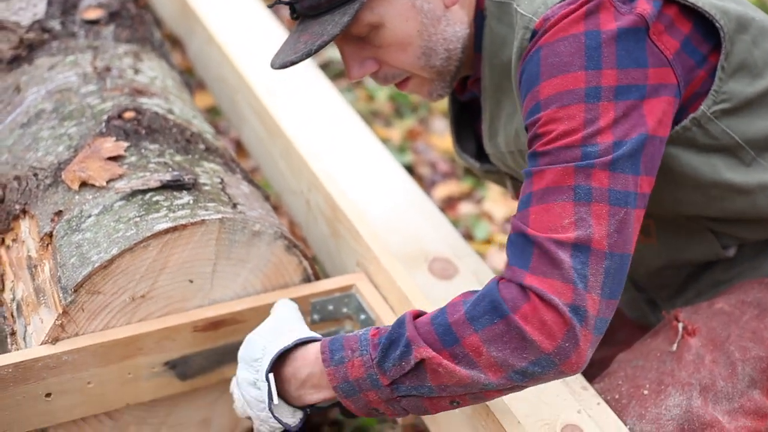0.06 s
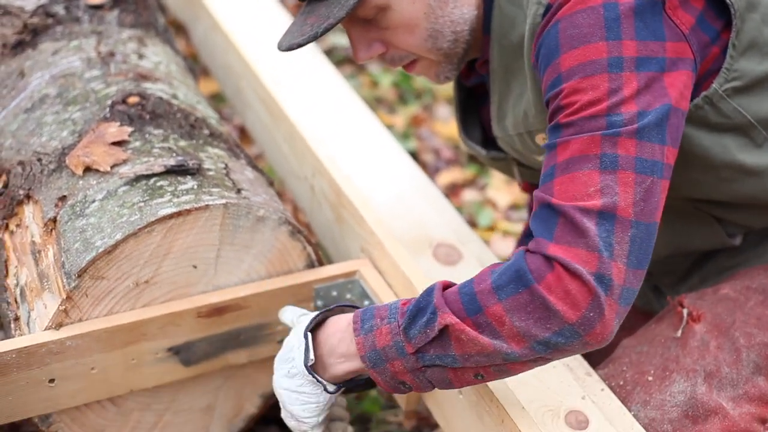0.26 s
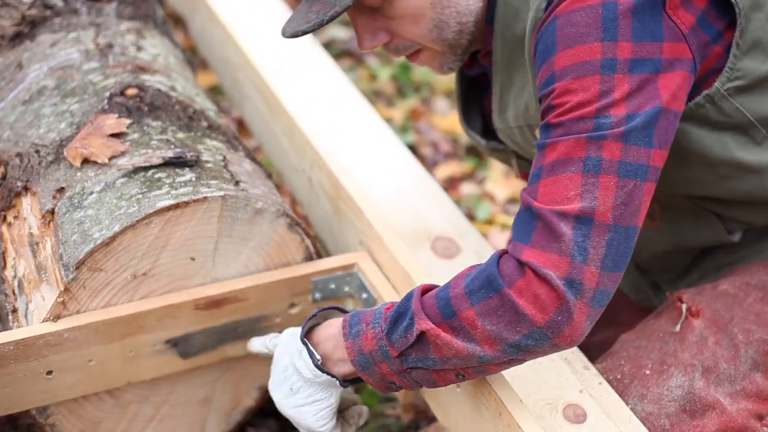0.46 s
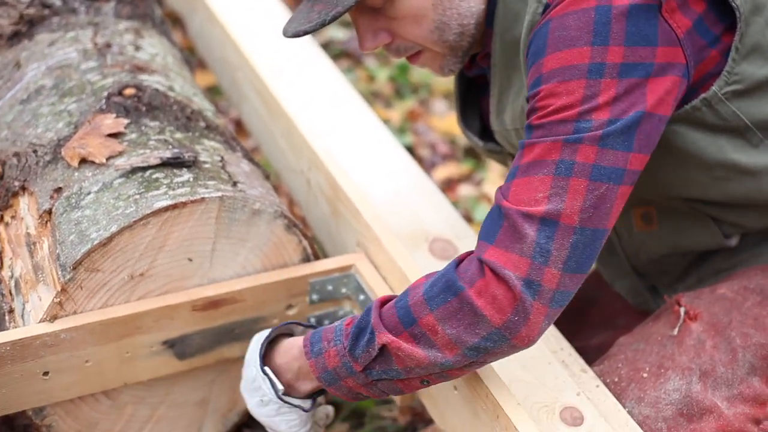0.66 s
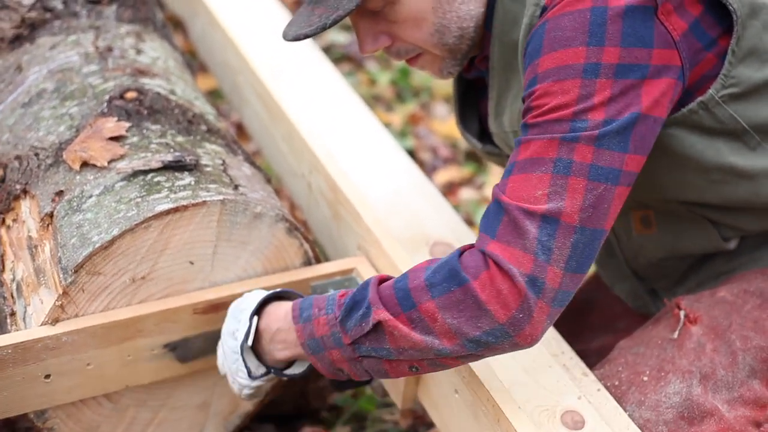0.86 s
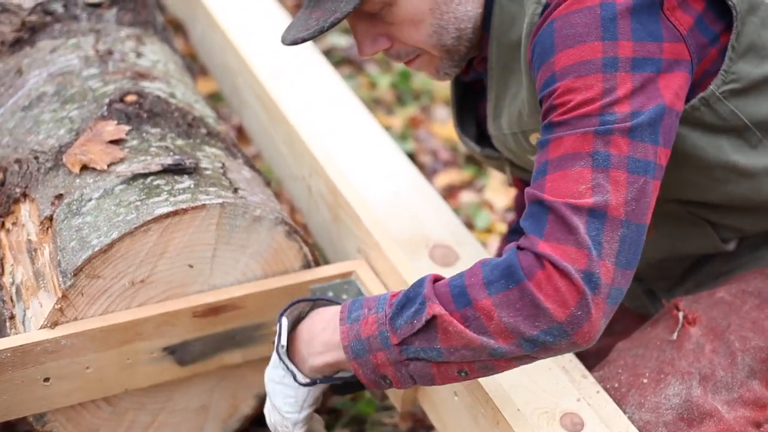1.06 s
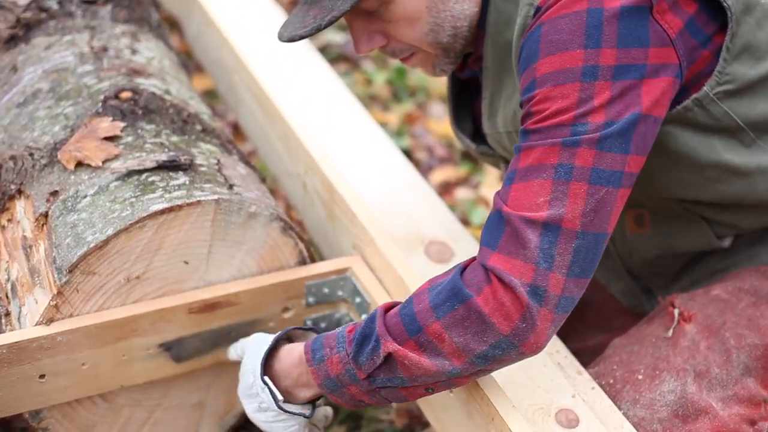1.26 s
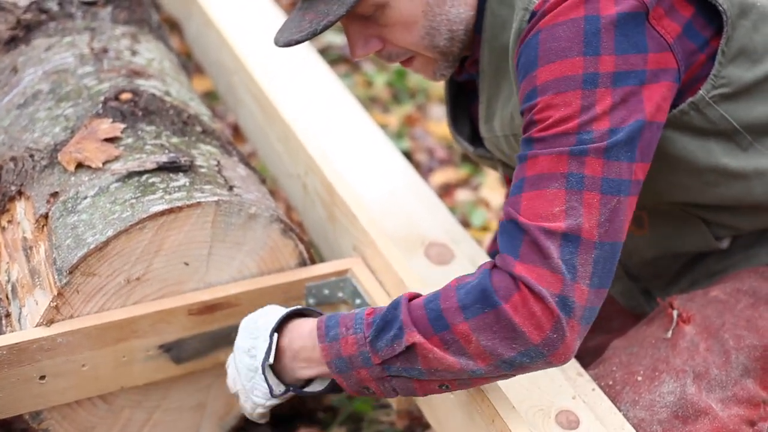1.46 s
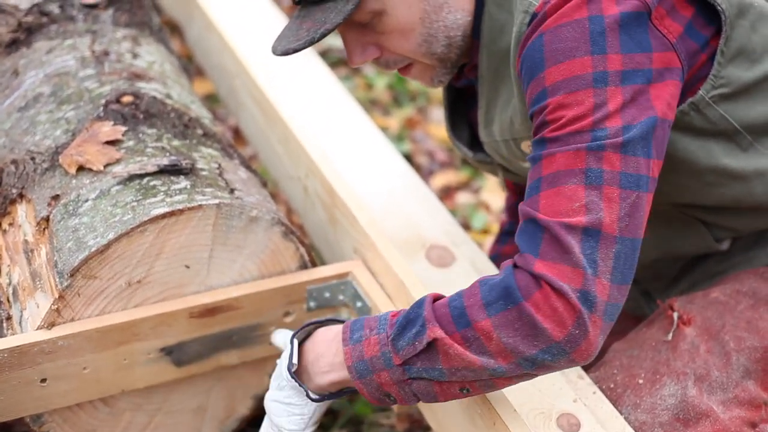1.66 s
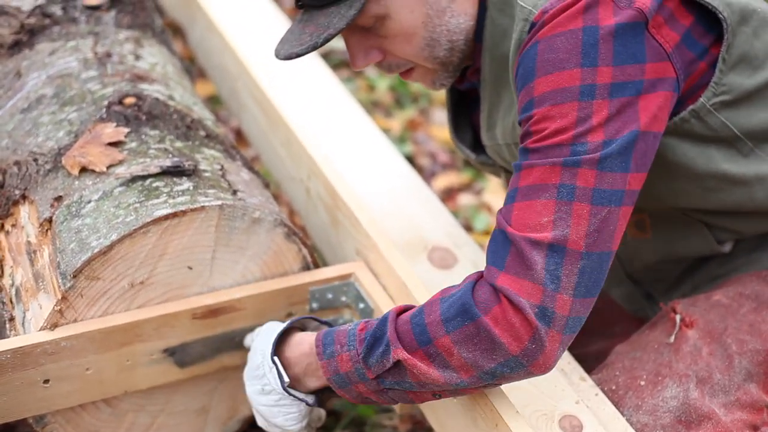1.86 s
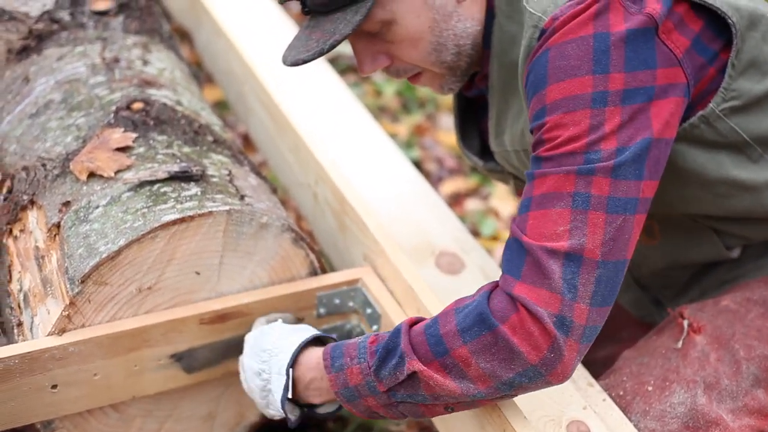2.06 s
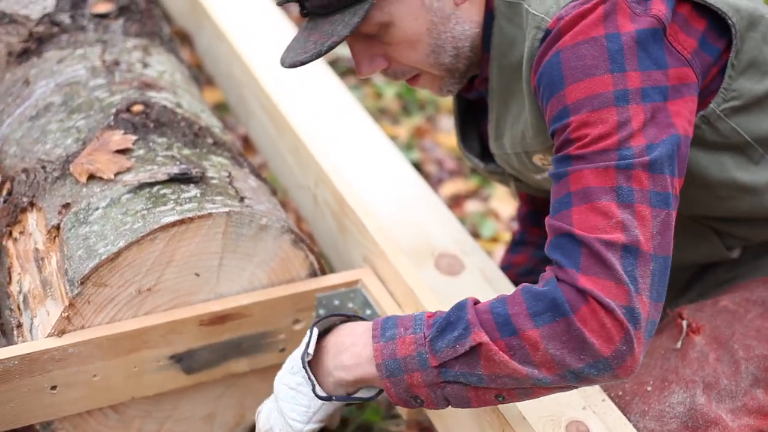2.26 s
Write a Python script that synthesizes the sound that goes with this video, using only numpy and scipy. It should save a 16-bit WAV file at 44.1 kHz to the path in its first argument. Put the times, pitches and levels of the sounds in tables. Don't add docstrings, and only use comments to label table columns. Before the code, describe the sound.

Metal clamp handling on a wooden frame, close and dry outdoors. Soft rubbing leads to a loud, slightly overloaded snap at 0.22 seconds. Small ticks and a woody, low knock cluster at 0.37-0.47, a sharp metallic knock at 0.78, a bright click at 0.91. Then mostly quiet scuffs, a tiny tick at 1.35, light rattling and a hissy metal scrape around 1.95-2.05, faint scuffs to the end. Faint air and low distant engine hum throughout.

```python
import sys
import numpy as np
from scipy import signal
from scipy.fft import rfft, irfft
from scipy.io import wavfile
from scipy.ndimage import uniform_filter1d

SR = 44100
rng = np.random.default_rng(int(sys.argv[2]) if len(sys.argv) > 2 else 0)


def digitize_waveform(pressure):
    field = np.atleast_2d(pressure).T
    bounded = np.clip(field, -1, 1)
    quanta = np.round(bounded * 32767).astype(np.int16)
    wavfile.write(sys.argv[1], SR, quanta)


def gain_from_db(level_db):
    decades = np.asarray(level_db, float) / 20
    return 10 ** decades


N = 101429


def evened(x):
    return x / np.sqrt(np.mean(x ** 2) + 1e-20)


def over_time(points):
    return np.interp(np.arange(N) / SR, *np.transpose(points))


def colour(points, size):
    hz, db = np.transpose(points)
    bins_hz = np.fft.rfftfreq(size, 1 / SR)
    return gain_from_db(np.interp(np.log(bins_hz + 1), np.log(hz + 1), db))


def add(mix, start_s, sound):
    part = mix[round(start_s * SR):][:len(sound)]
    part += sound[:len(part)]


def resonate(x, hz, width_hz):
    radius = np.exp(-np.pi * width_hz / SR)
    pole = radius * np.exp(2j * np.pi * hz / SR)
    for _ in range(2):
        x = 2 * signal.lfilter([1 - radius], [1, -pole], x).real
    return x


# time_s, gain_db
GAIN_CONTROL = [
    (0, -0.5),
    (.225, 2.5),
    (.25, -11.5),
    (.5, -8.5),
    (.77, -1.5),
    (.83, -6.5),
    (1.5, -3.5),
    (2.3, 0.5),
]


def camera_gain_db():
    return over_time(GAIN_CONTROL)


def preamp_hiss():
    low_pass = signal.butter(8, 14900, fs=SR, output="sos")
    return gain_from_db(-60.5) * signal.sosfilt(low_pass, rng.standard_normal(N))


def engine_drone():
    return gain_from_db(-59.5) * evened(resonate(rng.standard_normal(N), hz=65, width_hz=24))


# pitch_hz, density_db (per Hz)
AIR_SPECTRUM = [(15, -50), (40, -10.5), (219, -4), (387, -12), (431, -13.5), (1210, -15), (1580, -17),
                (7430, -20), (16300, -68.5)]


def air():
    real, imag, patches = rng.standard_normal((N // 128 + 5, 257, 3)).T
    patches = uniform_filter1d(uniform_filter1d(patches, 8, 0), 16, 1)
    spectrum = (real + 1j * imag) * gain_from_db(1.85 * evened(patches))
    hiss = signal.istft(spectrum, nperseg=512, noverlap=384)[1][:N]
    return gain_from_db(-42) * evened(irfft(rfft(hiss) * colour(AIR_SPECTRUM, N), N))


# time_s, level_db
RUB_EFFORT = [(0, -52), (.1, -48.5), (.15, -47.5), (.21, -35.5), (.26, -63.5), (.62, -58.5), (.75, -46.5),
              (.84, -56), (1.25, -58.5), (1.57, -53.5), (1.66, -50.5), (1.82, -60.5), (1.9, -55.5),
              (2.17, -48), (2.3, -48)]
# pitch_hz, width_hz, level_db
RUB_BODY = [(281, 130, -3), (943, 410, -5.5), (1444, 63, -8), (1622, 250, 0.5), (3450, 240, -11),
            (4350, 910, -2), (6500, 560, -10.5)]


def rubbing():
    catches_per_s, spread_db, flutter_db = 4000, 2.8, 2.5
    strength = gain_from_db(spread_db * np.minimum(rng.exponential(1, N), 4))
    caught = rng.random(N) < catches_per_s / SR
    catches = rng.standard_normal(N) * strength * caught
    body = np.zeros(N)
    for hz, width_hz, db in RUB_BODY:
        swell = uniform_filter1d(uniform_filter1d(rng.standard_normal(N), 1500), 1500)
        body += gain_from_db(db + flutter_db * evened(swell)) * evened(resonate(catches, hz, width_hz))
    return gain_from_db(3 + over_time(RUB_EFFORT) - camera_gain_db()) * evened(body)


# start_s, length_s, level_db, pitch_hz, rise_s
SLIPS = [(0.16, 0.1, -48, 3750, 0.069), (0.614, 0.16, -52.5, 5770, 0.028), (.803, 0.017, -39, 6700, 0.0039),
         (1.277, 0.067, -50, 5530, 0.012), (1.3474, 0.0017, -37, 7800, 0.00024),
         (1.349, 0.003, -42, 8200, 0.00081), (1.752, 0.0013, -54, 9500, 0.00044),
         (1.955, .02, -54.5, 7600, 0.0043), (1.998, 0.048, -31.5, 6500, 0.014),
         (1.999, 0.045, -37.5, 4800, 0.0015), (2.134, 0.098, -51.5, 6500, 0.0097),
         (2.168, 0.021, -46.5, 3730, 0.0051), (2.2, 0.012, -52, 7800, 0.0035)]


def slips():
    out, t = np.zeros(N), np.arange(4096) / SR
    for start_s, length_s, level_db, hz, rise_s in SLIPS:
        noise, roughness = rng.standard_normal((2, 4096))
        grit = noise * gain_from_db(1.2 * evened(uniform_filter1d(roughness, 40)))
        high_pass = signal.butter(6, hz / 1.44, "high", fs=SR, output="sos")
        low_pass = signal.butter(3, min(hz * 1.06, 20000), fs=SR, output="sos")
        hiss = evened(signal.sosfilt(np.vstack([high_pass, low_pass]), grit))
        hiss += gain_from_db(-30) * np.diff(grit, prepend=0)
        swell = t / max(rise_s, 1e-4)
        easing = (1 - t / length_s) / 0.47
        add(out, start_s, gain_from_db(level_db) * hiss * np.clip(np.minimum(swell, easing), 0, 1))
    return out


# level_db, t60_s (at 1 kHz), t60_fall (exponent of pitch), lowest_hz (radiated)
CROWD_LAWS = [
    (-7.5, 0.056, 0.62, 440),
    (-0.5, 0.13, 0.88, 420),
    (4, 0.067, 0.89, 1900),
    (-5.5, 0.057, 1, 272),
    (-8, 0.026, 1, 260),
    (-0.5, 0.042, 0.27, 890),
    (-6, 0.085, .9, 510),
    (-15, 0.026, .3, 490),
]
PARTS = ("clamp", "nut", "latch", "board", "rail", "peg", "catch", "tap")


def strong_ring(modes, t):
    return sum(gain_from_db(db - 60 * t / max(t60_s, .004)) * np.sin(2 * np.pi * hz * t) for hz, db, t60_s in modes)


def weak_ring(crowd, t60_1k_s, fall, t):
    hz = np.geomspace(180, 19000, 90)[:, None] * rng.uniform(1.0, 1.03, (90, 1))
    t60_s = t60_1k_s * (hz / 1000) ** -fall
    crowd_hz, crowd_db = np.transpose(crowd)
    size = gain_from_db(np.interp(np.log(hz), np.log(crowd_hz), crowd_db)) * np.sqrt(hz / t60_s)
    size = size * rng.uniform(-1.19, 1, (90, 1))
    return (size * gain_from_db(-60 * t / t60_s) * np.sin(2 * np.pi * hz * t)).sum(0)


def blows(part, hits, modes, crowd):
    crowd_db, t60_1k_s, fall, lowest_hz = CROWD_LAWS[PARTS.index(part)]
    t, out = np.arange(3072) / SR, np.zeros(N)
    strong = evened(strong_ring(modes, t))
    onset = 1 - np.exp(-(t / 0.000093) ** 2)
    radiation = signal.butter(3, lowest_hz, "high", fs=SR, output="sos")
    for start_s, level_db, chatter_s, hardness_hz in hits:
        weak = evened(weak_ring(crowd, t60_1k_s, fall, t))
        contact = 0.39 * rng.standard_normal(1024) * np.exp(-t[:1024] / max(chatter_s, 1e-4))
        contact[0] = min(1, 0.0014 / chatter_s)
        contact = signal.lfilter(*signal.butter(2, min(hardness_hz, 20000), fs=SR), contact)
        body = signal.fftconvolve(contact, (strong + gain_from_db(crowd_db) * weak) * onset)
        add(out, start_s, gain_from_db(level_db) * 0.082 * evened(signal.sosfilt(radiation, body)))
    return out


# pitch_hz, level_db, t60_s
RAIL_MODES = [(244, 10.5, 0.056), (510.4, -1.5, 0.075), (923, -1, 0.063), (1570, -6, 0.012),
              (1690, -7, 0.05)]
# pitch_hz, level_db
RAIL_CROWD = [(88, -27), (150, -27), (600, -17), (1170, -16), (1630, -18), (2480, 7), (4400, -1),
              (12000, -45), (22000, -120)]
# start_s, level_db, chatter_s, hardness_hz
RAIL_HITS = [(.092, -26.5, 0.0038, 1160), (0.099, -29, .008, 800), (.456, -8.5, 0.0069, 405),
             (1.639, -28, 0.0033, 1000), (1.654, -45, 0.011, 800), (1.9605, -24, 0.004, 2580),
             (1.967, -23, 0.0017, 700), (1.987, -30.5, 0.0068, 600), (2.145, -35.5, 0.0074, 600)]


def rail():
    return blows("rail", RAIL_HITS, RAIL_MODES, RAIL_CROWD)


# pitch_hz, level_db, t60_s
PEG_MODES = [(997, 1, 0.031), (1434, -4, 0.052), (1590, 5.5, 0.044), (1740, 2.5, 0.02), (1920, -7.5, 0.014)]
# pitch_hz, level_db
PEG_CROWD = [(500, -16), (900, 2), (1600, -18), (2100, -40), (4000, -1)]
# start_s, level_db, chatter_s, hardness_hz
PEG_HITS = [(.04, -37.5, 0.0034, 3060), (0.098, -35.5, .008, 3020), (0.116, -34, 0.0077, 3000),
            (0.159, -44, .012, 3000), (0.2269, -22.5, 0.0066, 3020), (0.432, -47, 0.0055, 3000),
            (1.14, -38, 0.014, 3000), (1.316, -32, 0.0064, 3000), (1.451, -35.5, 0.0097, 3000),
            (1.581, -35.5, 0.0021, 5000), (1.642, -34.5, 0.0095, 3000), (1.669, -35, 0.0049, 3000),
            (1.721, -43, 0.014, 3000), (1.788, -36, 0.017, 3000), (1.943, -29, 0.018, 3000),
            (1.961, -23.5, 0.0037, 4000), (1.968, -24, 0.0063, 3020), (1.98, -41, .006, 3000),
            (1.994, -32, 0.0027, 3000), (2.005, -29.5, 0.0039, 3000), (2.037, -35, 0.0031, 3000),
            (2.108, -40, .008, 3000), (2.173, -34.5, 0.011, 3020), (2.196, -36, .006, 3000),
            (2.264, -28, 0.0048, 3100)]


def peg():
    return blows("peg", PEG_HITS, PEG_MODES, PEG_CROWD)


# pitch_hz, level_db, t60_s
TAP_MODES = [(1000, -2.5, 0.049), (1125, 6, 0.043), (1340, 3, 0.037), (1654, -1.5, 0.055)]
# start_s, level_db, chatter_s, hardness_hz
TAP_HITS = [(.113, -35.5, .004, 3000), (.372, -20.5, 0.0026, 1780), (0.4551, -23, 0.00038, 1500),
            (.895, -27, 0.0022, 3000)]


def tap():
    return blows("tap", TAP_HITS, TAP_MODES, PEG_CROWD)


# pitch_hz, level_db, t60_s
BOARD_MODES = [(226, 3.5, 0.084), (338, -2.5, 0.11), (600, -2.5, 0.097), (935, 4.5, .065), (1402, 7, 0.053),
               (1546, 5, 0.025), (1645, 7, 0.036), (1880, -16, 0.035)]
# pitch_hz, level_db
BOARD_CROWD = [(88, -32), (150, 5), (275, -12), (713, -8.5), (1690, 0), (2530, -15), (4220, -30),
               (12000, -62), (15600, -95), (22000, -120)]
# start_s, level_db, chatter_s, hardness_hz
BOARD_HITS = [(0.2217, -21, 0.002, 3000), (0.237, -19.5, 0.0095, 1180), (0.431, -20, 0.0024, 3000),
              (.4532, -5, 0.00082, 5000), (.4582, -10, 0.00039, 2000), (.469, -15.5, 0.00071, 690),
              (0.739, -29, 0.04, 4000), (0.82, -46, 0.003, 3704)]


def board():
    return blows("board", BOARD_HITS, BOARD_MODES, BOARD_CROWD)


# pitch_hz, level_db, t60_s
LATCH_MODES = [(2020, -21, 0.054), (3210, 3, 0.021), (4240, -5, 0.054), (5130, -14, .02), (8100, -9, 0.016)]
# pitch_hz, level_db
LATCH_CROWD = [(240, -54), (400, -59), (1990, 4.5), (2590, -16.5), (4440, 2.5), (8110, -12.5), (8900, -48),
               (16000, -58)]
# start_s, level_db, chatter_s, hardness_hz
LATCH_HITS = [(0.3714, -27, 0.0028, 10800), (0.426, -23, 0.0033, 9900), (0.427, -26, .001, 9900),
              (0.4475, -21, 0.0039, 11800), (0.4537, -17.5, 0.0015, 12000), (2.265, -34.5, 0.0025, 9100)]


def latch():
    return blows("latch", LATCH_HITS, LATCH_MODES, LATCH_CROWD)


# pitch_hz, level_db, t60_s
NUT_MODES = [(1033, -9.5, 0.041), (1380, 2.5, 0.022), (2345, -6, 0.026), (3610, 1.5, 0.024),
             (4630, 3.5, 0.0096), (5300, -2.5, 0.03), (6950, -7, 0.036), (544, -19, 0.16)]
# pitch_hz, level_db
NUT_CROWD = [(180, -54), (300, -46), (1390, -12), (2070, -20), (3520, -19), (4020, -23), (4670, -5),
             (16000, -60)]
# start_s, level_db, chatter_s, hardness_hz
NUT_HITS = [
    (0.7769, -7, 0.00029, 8840),
    (0.7836, -16, 0.00073, 9900),
    (2.294, -31.5, 0.0054, 4660),
]


def nut():
    return blows("nut", NUT_HITS, NUT_MODES, NUT_CROWD)


# pitch_hz, level_db, t60_s
CATCH_MODES = [(535, -22, 0.066), (1590, -14, 0.028), (1900, -14, 0.027), (2150, 1, 0.016),
               (3390, -7.5, 0.022), (3720, -0.5, 0.019), (4385, 0.5, 0.017), (4990, -7, 0.022),
               (5200, -10, 0.018), (6020, -20, 0.027), (6850, -23, 0.015), (7450, -33, 0.016),
               (7930, -16, 0.018), (9800, -29, 0.012)]
# pitch_hz, level_db
CATCH_CROWD = [(300, -23), (2000, -5), (4400, -2), (8000, -14), (11000, -41), (16000, -48)]
# start_s, level_db, chatter_s, hardness_hz
CATCH_HITS = [
    (0.9063, -9.5, 0.00011, 11800),
    (.9072, -18.5, 0.00016, 12000),
    (0.9083, -15, 0.00022, 11900),
    (.911, -31, 0.0012, 12000),
]


def catch():
    return blows("catch", CATCH_HITS, CATCH_MODES, CATCH_CROWD)


# pitch_hz, level_db, t60_s
CLAMP_MODES = [(306, -10, 0.11), (800, -18.5, 0.063), (1162, -15, 0.12), (2282, 2.5, 0.0089),
               (3100, 9.5, 0.0039), (3596, -2, 0.018), (4390, 2, 0.014), (4800, 6.5, 0.011),
               (5030, -1, 0.012), (5880, 1, 0.013), (6670, 1.5, 0.015), (7800, -8.5, 0.0099),
               (10080, -15.5, 0.0066), (14200, -12, .004)]
# pitch_hz, level_db
CLAMP_CROWD = [(120, -44), (200, -7), (944, -2), (1610, -28), (2610, 1.5), (4880, 3), (5560, -5),
               (6810, 0.5), (16500, -35)]
# start_s, level_db, chatter_s, hardness_hz
CLAMP_HITS = [
    (0.2216, -7, 0.00014, 17500),
    (.2236, -27, 0.00012, 12000),
    (0.242, -23, 0.0076, 5000),
]


def clamp():
    return blows("clamp", CLAMP_HITS, CLAMP_MODES, CLAMP_CROWD)


def scene():
    background = preamp_hiss() + engine_drone() + air()
    wood = rail() + peg() + tap() + board()
    metal = latch() + nut() + catch() + clamp()
    return (background + rubbing() + gain_from_db(5.5) * (slips() + wood + metal))[None]


def roll_off(x):
    return signal.sosfilt(signal.butter(12, 16670, fs=SR, output="sos"), x)


def record(dry):
    limited = signal.oaconvolve(dry, signal.firwin(255, 16000, fs=SR)[None], "same")
    finished = np.clip(limited * gain_from_db(camera_gain_db()), -1, 1)
    return roll_off(finished)


dry = scene()
out = record(dry)
digitize_waveform(out)
```